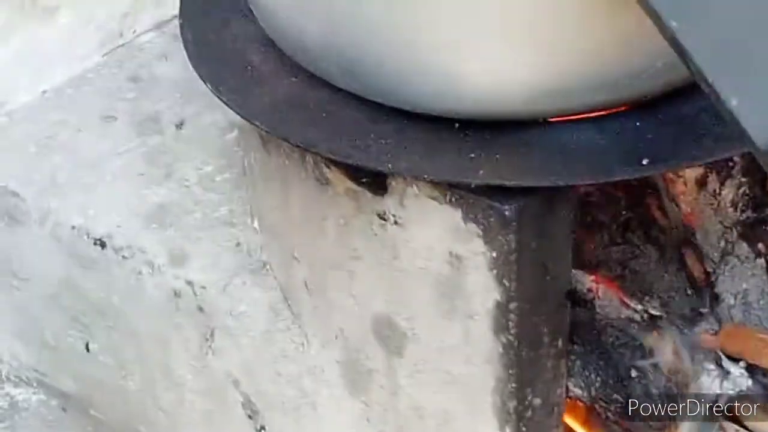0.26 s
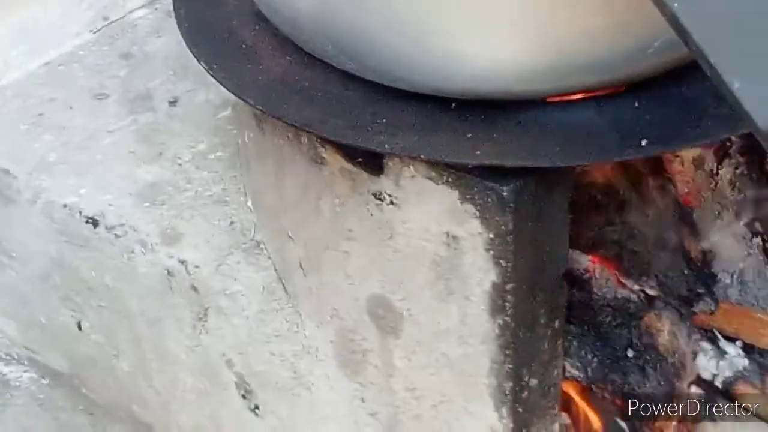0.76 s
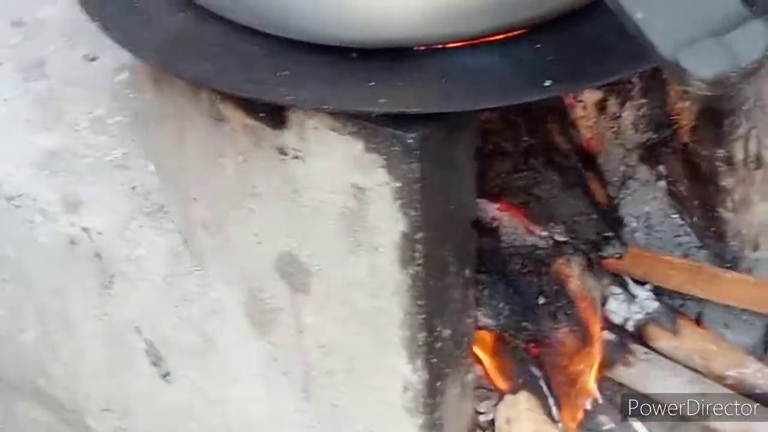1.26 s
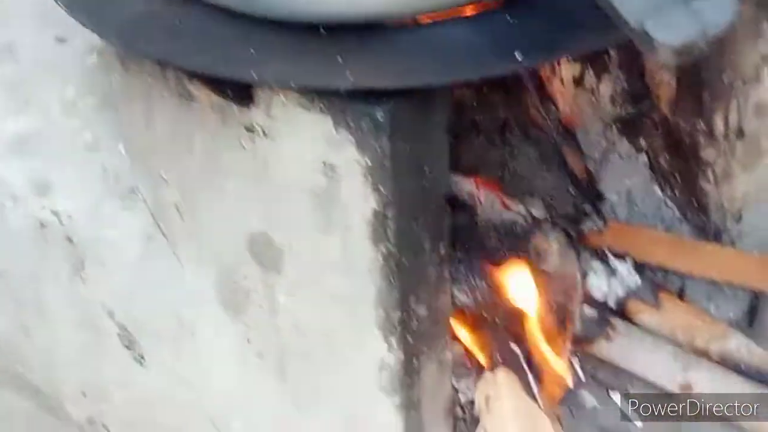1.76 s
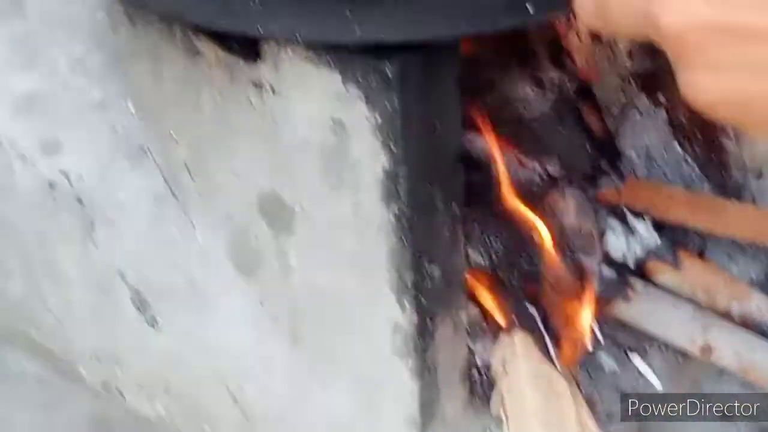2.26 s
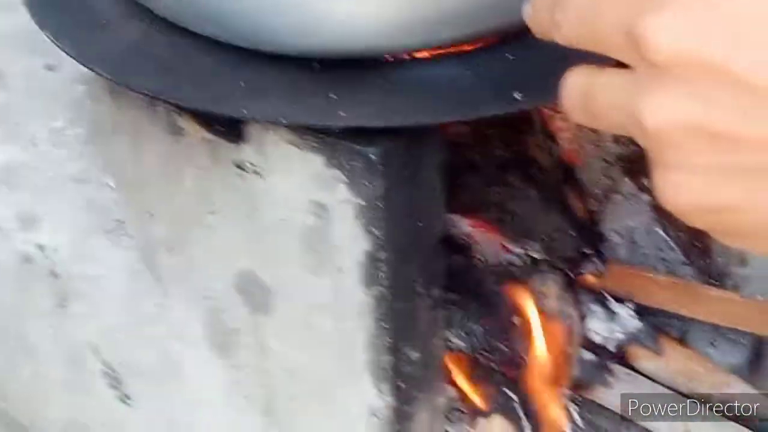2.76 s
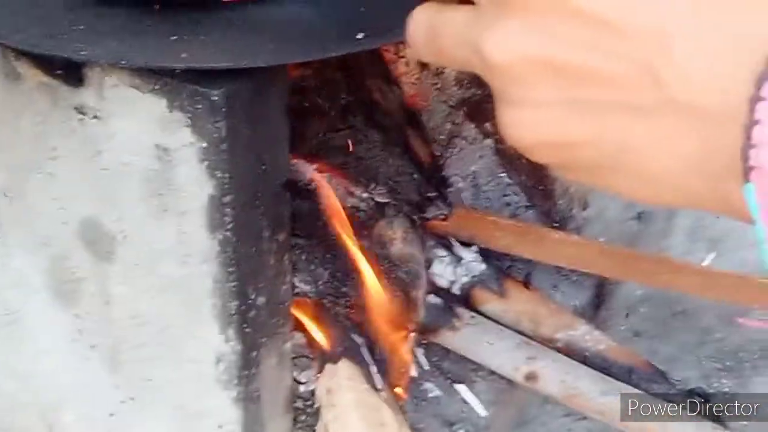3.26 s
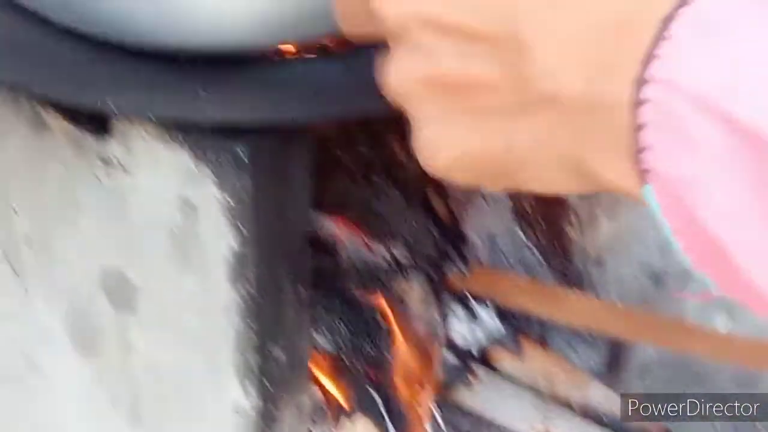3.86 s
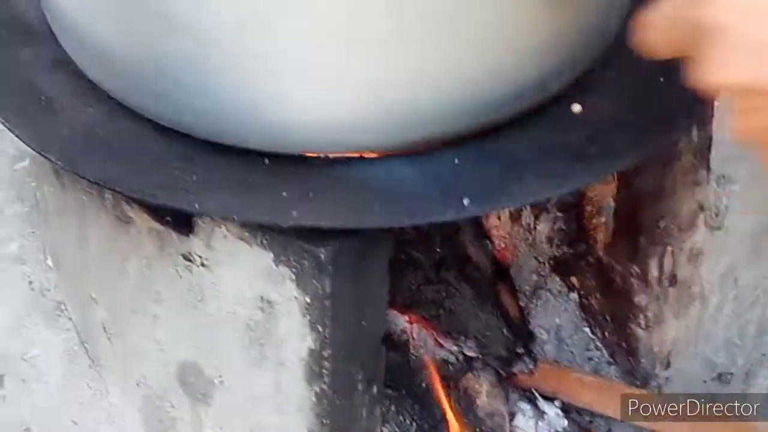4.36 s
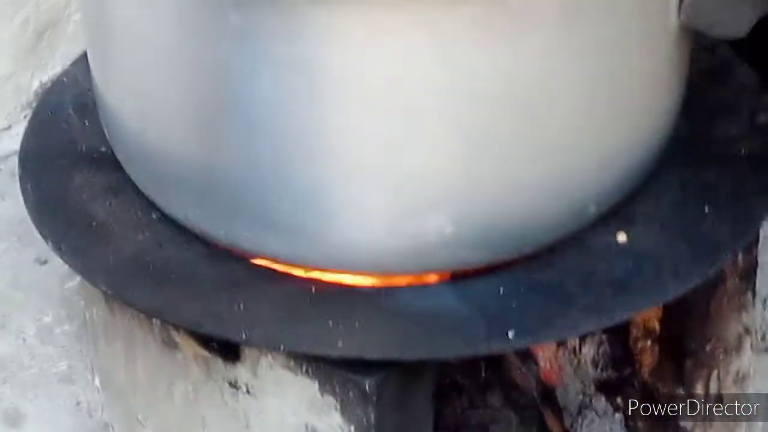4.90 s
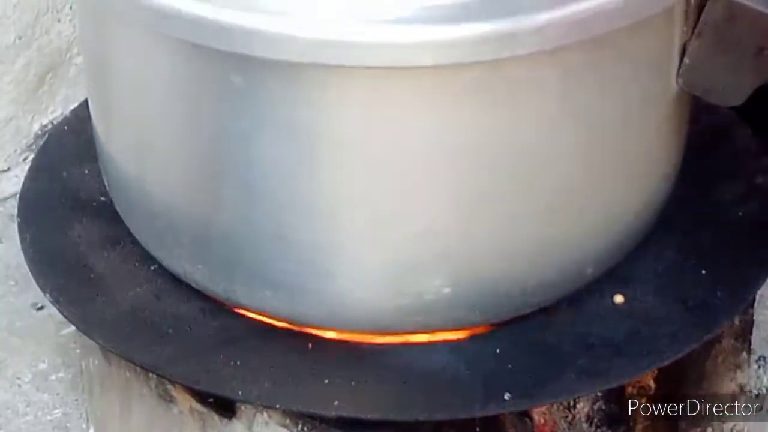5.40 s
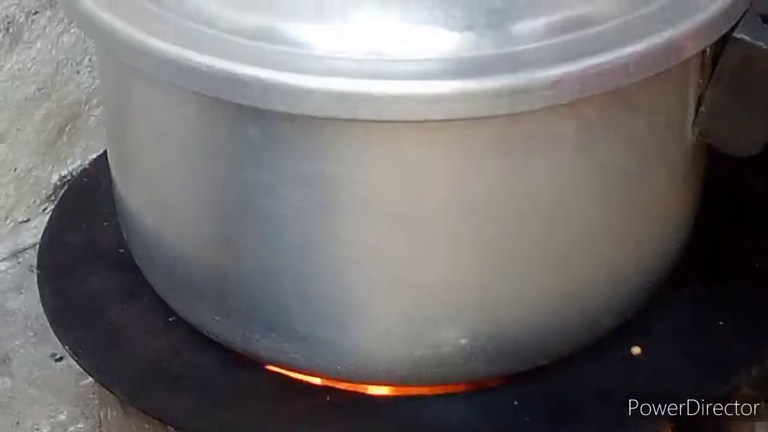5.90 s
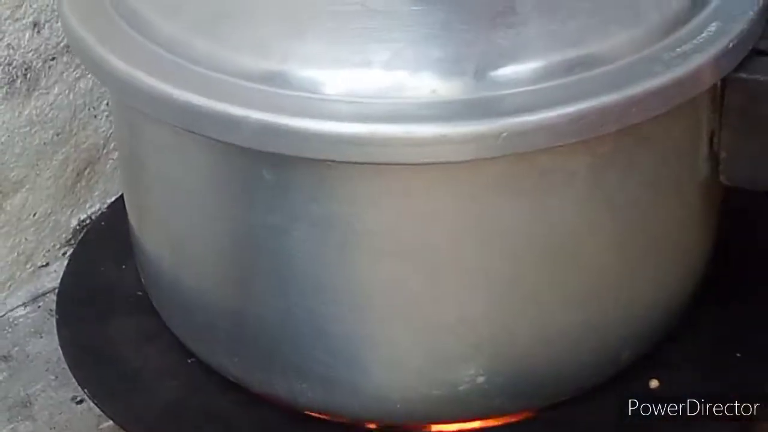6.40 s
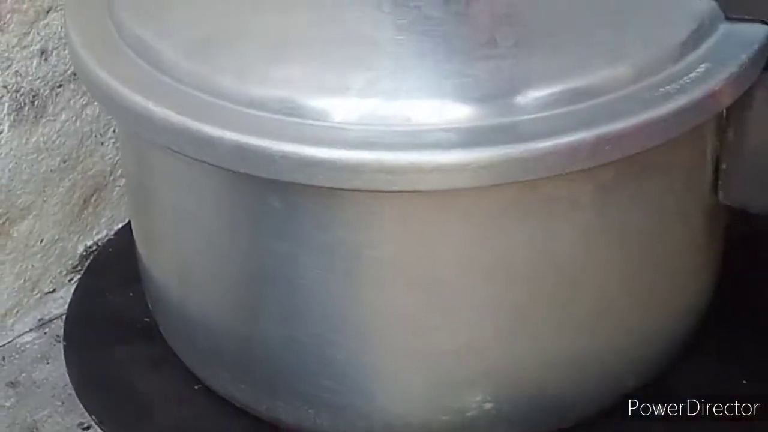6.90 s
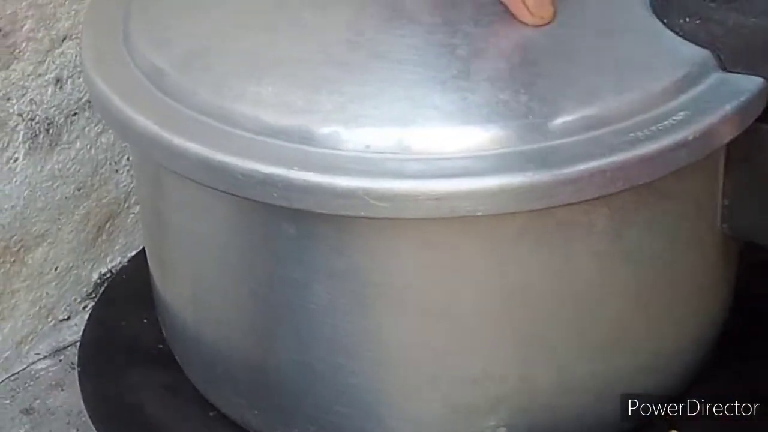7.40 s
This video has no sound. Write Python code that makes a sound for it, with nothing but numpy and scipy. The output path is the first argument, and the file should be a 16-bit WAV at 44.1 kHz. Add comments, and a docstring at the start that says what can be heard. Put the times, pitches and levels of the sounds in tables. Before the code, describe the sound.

A phone held near a metal pot in the open air picks up quiet touches, a sharp clear clink early on, then dull booming knocks and snappy ticks in the middle. Small scrapes and rattles of the lid follow, and the strongest burst of hollow metal clunks comes near the end, fading to tiny ticks. Low soft flutter, faint hiss and a distant wavering motor stay far underneath, without noticeable echo.

```python
"""Outdoors beside a small wood fire, an aluminium pot and its lid are handled close to a phone.
Knocks, ticks and scrapes are shaped noise filtered by the damped modes of the pot;
single modes also stand out as decaying or sustained sines. Low throbs, resonant noise, flutter
in bursts and thump under heavy knocks; a far motor hums as two sines on one wavering pitch;
the open air hisses faintly as coloured noise whose bands drift."""
import sys
import numpy as np
from scipy import signal
from scipy.fft import rfft, irfft, next_fast_len
from scipy.io import wavfile
from scipy.ndimage import uniform_filter1d

SR = 44100
rng = np.random.default_rng(int(sys.argv[2]) if len(sys.argv) > 2 else 0)


def bounce(signal):
    """Save signal as a 16-bit WAV file at the path given by the first command-line argument."""
    frames = np.transpose(np.atleast_2d(signal))
    limited = np.clip(frames, -1, 1)
    pcm = np.round(limited * 32767).astype(np.int16)
    wavfile.write(sys.argv[1], SR, pcm)


N = 337365

# frequency bands of a contact, in order thud, body, clink, edge, air: low_hz, high_hz
BANDS = [(90, 300), (300, 1200), (1200, 4000), (4000, 8000), (8000, 18000)]
# pot and lid modes, damped by the hand: mode_hz, level_db (relative), t60_s
POT_MODES = [(120, -6, .2), (165, 0.6, .24), (221, -3, .2), (295, -3, .15), (390, -2, .12), (533, -5, .12),
             (690, -8, .1), (790, -7, .11), (880, -12, .09), (1010, -6, .08), (1083, -11, .08),
             (1312, -10, .08), (1510, -14, .12), (1628, -4, .14), (1814, -12, .14), (2035, -12, .1),
             (2210, -16, .1), (2320, -8, .06), (2555, -16, .09), (2760, -18, .09), (3015, -10, .07),
             (3245, -10, .08), (3540, -14, .07), (3900, -14, .06), (4350, -16, .06), (4590, -14, .05),
             (4750, -18, .05), (5130, -14, .05), (5440, -14, .04), (5720, -15, .04), (6200, -20, .035)]
# knocks: start_s, clink_db, body_db and edge_db (both above the clink), brightest_hz,
# rattle_s (t60 before the stretch of each band)
KNOCKS = [(0.353, -65, -6, -1, 1860, 0.098), (.375, -59, -17, -6, 1800, 0.13),
          (0.441, -70, -12, -12, 1750, 0.063), (0.606, -71.5, -1, -13, 2230, 0.19),
          (0.624, -79, 18.5, -1, 338, 0.072), (1.2514, -47.5, -19, -6.5, 1463, 0.08),
          (1.3573, -24, -17, -3, 3260, 0.12), (1.4519, -49, -14, -11.5, 760, 0.029),
          (1.5809, -38, -6, -7, 690, 0.066), (1.599, -63.5, -19, -19.5, 1628, 0.26),
          (2.09, -78, 21.5, -15, 515, 0.16), (2.468, -60, -10, -4, 1450, 0.12),
          (2.6677, -63.5, 28, 6.5, 241, 0.18), (2.751, -31, 2.5, -12, 158, 0.23),
          (2.988, -70.5, 16, -8, 440, 0.12), (3.034, -58.5, 19, -10, 590, 0.11),
          (3.1189, -43, 6.5, -4.5, 165, 0.12), (3.1838, -33.5, 2.5, 0, 203, 0.13),
          (3.2466, -44, 5, -26.5, 445, 0.042), (3.3949, -68, 13, -20.5, 725, 0.14),
          (3.844, -72, 24, -12, 440, 0.079), (3.947, -65, 3, -12, 1353, 0.063),
          (3.9643, -54, 12.5, -5, 446, 0.07), (4.12, -52.5, 8, -1.5, 418, 0.49),
          (4.2436, -56.5, 11, 3.5, 361, 0.16), (4.2823, -49, 8.5, -7, 335, 0.29),
          (4.366, -58, 3, -11, 785, 0.04), (4.4592, -45, 9, -7, 730, 0.16), (4.591, -58, 5, 6, 790, 0.054),
          (4.9069, -44, -36.5, -12.5, 1634, 0.026), (5.0725, -42, -30, -8.5, 1142, 0.036),
          (5.185, -38, 13.5, -2.5, 334, 0.078), (5.448, -74.5, 22, -12.5, 201.6, 0.13),
          (5.4802, -73, 20, -14, 425.5, 0.044), (5.601, -49.5, 9.5, -16.5, 255, 0.067),
          (5.8417, -64, -10, -9.5, 1160, 0.25), (5.8798, -65.5, 9.5, 5.5, 550, 0.096),
          (6.0471, -52, -6, -14, 1300, 0.06), (6.065, -49, 12.5, -27, 382, 0.062),
          (6.1536, -34.5, 3, -14.5, 642, 0.071), (6.4432, -55.5, 19, -4.5, 629.8, 0.29),
          (6.46, -57, 17, -16, 600, .04), (6.483, -51, 7, -4.5, 304, 0.021),
          (6.521, -33, 5.5, -13, 227, 0.082), (6.5993, -26, 4.5, -4.5, 480, 0.086),
          (6.616, -39, 1, -6, 900, 0.027), (6.6455, -22.5, 4, -6.5, 573, 0.052),
          (6.6571, -31.5, -9, -2, 396, 0.045), (6.754, -61, 10, -20, 1000, .04),
          (6.772, -56, 11, -10, 1017, 0.022), (6.7863, -29.5, -5.5, -18, 215, 0.083),
          (6.843, -40, 6.5, -28, 200, 0.03), (6.9354, -55.5, 18.5, -0.5, 208, 0.1),
          (7.0755, -31, -37, -16, 3640, 0.025), (7.1038, -41.5, -8.5, -14.5, 1730, 0.086),
          (7.149, -46.5, 7.5, -24, 140, 0.044), (7.165, -49, 12.5, 1, 153.6, 0.038)]
# stretch of the rattle in each band, the bass lasting longest: factor (no unit)
RATTLE_STRETCH = [1.6, 0.85, 0.76, 0.64, 0.12]
BLOCK = 16384  # samples of one blow and of one filter response


def undb(db):
    """Decibel definition: amplitude is ten to the power of dB / 20."""
    return 10 ** (np.asarray(db) / 20)


def unit(x):
    """Root-mean-square normalisation: signals of equal power start from one level."""
    return x / np.sqrt(np.mean(x ** 2))


def clock():
    """Uniform sampling: the time of every sample in seconds."""
    return np.arange(N) / SR


def bin_hz(size):
    """Discrete Fourier transform: its bins lie SR / size apart."""
    return np.arange(size // 2 + 1) * SR / size


def curve(table):
    """Linear interpolation in time of the columns that follow the time column."""
    s, *columns = np.transpose(table)
    return [np.interp(clock(), s, column) for column in columns]


def shape(table, size):
    """Spectral colour: dB values joined by straight lines over log frequency give a filter gain."""
    hz, db = np.transpose(table)
    return undb(np.interp(np.log(bin_hz(size) + 1), np.log(hz), db))


def walk(rate_hz):
    """Band-limited random modulation: held random levels, averaged twice, with unit RMS."""
    hold = int(SR / rate_hz)
    held = np.repeat(rng.standard_normal(N // hold + 1), hold)
    return unit(uniform_filter1d(uniform_filter1d(held, hold), hold)[:N])


def quick_waver(samples):
    """Moving average of white noise, rescaled to unit spread, for fluctuation within one blow."""
    return uniform_filter1d(rng.standard_normal(BLOCK), size=samples) * np.sqrt(samples)


def motor():
    """Engine orders: the third order and a weak first share one wavering rotation."""
    # far motor: start_s, third_order_hz, level_db
    motor_track = [(0, 116.7, -78), (2.5, 118, -72), (3.6, 103.7, -66.5), (4.6, 105.2, -77.5),
                   (6, 94.5, -92.5), (7.65, 103.3, -70.5)]
    hz, db = curve(motor_track)
    phase = 2 * np.pi * np.cumsum(hz * (1 + .035 * walk(7.6))) / SR
    orders = np.sin(phase) + 0.19 * np.sin(phase / 3)
    return undb(db + walk(19)) * np.sqrt(2) * orders


def air():
    """Coloured broadband noise: overlapping octave bands drift together and flicker alone."""
    # open air: frequency_hz, density_db (per Hz, relative)
    air_colour = [(15, -45.5), (25, -6.5), (70, 0.5), (103, 1.5), (167, -10), (244, -5.5), (829, -23.5),
                  (4110, -33), (5850, -29.5), (8100, -44), (13600, -44), (15200, -42), (16000, -57)]
    level_db = -66.5
    size = next_fast_len(N)
    hiss = rfft(rng.standard_normal(size)) * shape(air_colour, size)
    octave = np.log2(bin_hz(size) + 1)
    common_db = .8 * walk(3)
    total = np.zeros(N)
    for k in range(4, 16):
        # triangular weights over octaves add up to one
        weight = np.clip(1 - abs(octave - k), 0, 1)
        total += irfft(hiss * weight, size)[:N] * undb(common_db + 1.4 * walk(9))
    return unit(total) * undb(level_db)


def throb_level():
    """Attack, hold and decay: each throb rises fast, holds and falls to a rest, linearly in dB."""
    # low throbs, fluttering bursts and the deep thumps under heavy knocks: start_s, hold_s, level_db
    throbs = [(.28, 0.017, -58), (0.625, 0.19, -56.5), (1.425, 0.31, -72), (1.734, 0.28, -54.5),
              (2.1, 0.039, -52.5), (2.728, 0.014, -44.5), (3.181, 0.048, -33.5), (3.868, 0.24, -50.5),
              (4.306, .1, -46), (4.457, 0.12, -51.5), (5.18, 0.026, -42.5), (5.4, .02, -59.5),
              (5.606, 0.03, -56), (6.041, 0.025, -61), (6.602, .15, -46.5), (6.812, 0.034, -42.5),
              (7.18, 0.015, -65.5), (7.354, 0.018, -65), (7.589, 0.059, -59)]
    rise_db_s, fall_db_s, rest_db = 799.5, 169.5, -74
    t = clock()
    start, hold, db = (column[:, None] for column in np.transpose(throbs))
    loss = np.maximum(rise_db_s * (start - t), fall_db_s * (t - start - hold))
    return undb(np.maximum((db - np.maximum(loss, 0)).max(axis=0), rest_db))


def low_throbs():
    """Broad resonance: band-passed noise becomes low, unsteady flutter and deep thumps."""
    centre_hz, width_hz = 78.7, 27
    band = [centre_hz - width_hz / 2, centre_hz + width_hz / 2]
    resonance = signal.butter(2, band, "band", fs=SR, output="sos")
    tone = signal.sosfilt(resonance, rng.standard_normal(N))
    # partial compression keeps the swing fairly even
    swing = np.sqrt(uniform_filter1d(tone ** 2, size=1500))
    return unit(tone / swing ** 0.58) * throb_level()


def metal(size):
    """Modal resonance: each mode is a complex pole whose bandwidth follows from its decay time."""
    # colour of bare metal contact: frequency_hz, density_db (per Hz, relative)
    contact_colour = [(40, -30), (90, -14), (140, -5), (390, -5), (800, -9), (1360, -16), (3250, -22),
                      (6300, -23), (7600, -33), (10000, -39), (13000, -48), (15200, -43), (16400, -52)]
    hz = bin_hz(size)
    mode_hz, db, t60 = (column[:, None] for column in np.transpose(POT_MODES))
    half_width_hz = np.log(1000) / (2 * np.pi * np.clip(t60, .02, .25))
    # neighbouring modes alternate in sign
    sign = (-1.) ** np.arange(len(POT_MODES))[:, None]
    modes = sign * undb(db) / (half_width_hz + 1j * (hz - mode_hz))
    gates = []
    for band in BANDS:
        sos = signal.butter(4, band, "band", fs=SR, output="sos")
        gates.append(signal.sosfreqz(sos, hz, fs=SR)[1])
    return hz, gates, shape(contact_colour, size), modes


def response_rms(response):
    """Root mean square of a frequency response over its bins."""
    return np.sqrt(np.mean(np.abs(response) ** 2))


def sounding(gate, bare, ring, ring_db):
    """Superposition in one band: bare contact at unit RMS plus modal ringing at a relative level."""
    contact = bare / response_rms(gate * bare)
    ringing = ring / response_rms(gate * ring)
    return gate * (contact + undb(ring_db) * ringing)


def ring_share_db(band, db):
    """Modal range: every band rings at the given level except the air band, which has no modes."""
    return db if band < len(BANDS) - 1 else -np.inf


def knock_bands(clink_db, body, edge, bright_hz):
    """Spectral balance of a knock: the lower its brightest pitch, the more thud over its body."""
    thud_hz, slope_db_per_octave, least_db, air_below_edge_db = 211, -10, -23.5, 22
    thud = body + max(slope_db_per_octave * np.log2(bright_hz / thud_hz), least_db)
    return clink_db + np.array([thud, body, 0, edge, edge - air_below_edge_db])


def pressure():
    """Friction envelopes: a touch window times a swell for each stroke; knocks leave a dying clatter."""
    # rubbing strokes: touch_start_s, swell_peak_s, touch_end_s, clink_db, body_db, edge_db, air_db
    # (last three above the clink). Start and end bound the touch, silent where the end comes first;
    # the swell is set by its peak, which may lie outside. Thud and body sound at body_db plus the trim.
    strokes = [(0.27, 0.38, 0.41, -72.5, -4, 9, 4), (0.43, 0.46, 0.66, -73, 0, -8, -4.5),
               (0.57, 0.603, 0.7, -81, 9, -20, -11), (1.32, 1.405, 1.68, -57, -24, -11, -31),
               (3.07, 3.024, 3.38, -64, 4, 1.5, -48), (3.12, 3.19, 3.288, -47.5, 15.5, 3, -43),
               (4, 4.123, 4.29, -59, 10, -1.5, -6.5), (4.2, 4.287, 4.41, -54.5, 11, 0, -3.5),
               (4.516, 4.479, 4.787, -50.5, 3, -3, -9), (4.75, 4.6, 4.68, -56, 1.5, 6, 8),
               (5.42, 5.3, 5.45, -78, 19, -3.5, -9), (5.7, 5.776, 5.9, -76, 14, -9.5, -3.5),
               (2, 2.094, 1.95, -87, 14.5, -15.5, -19.5), (5.95, 6.06, 6.2, -66, 0, 5.5, -12),
               (6, 6.2, 6.25, -80, 23.5, -1, -18), (6.55, 6.628, 6.74, -44.5, 10, -2, -39),
               (6.94, 6.792, 6.86, -51, 14.5, 6, -24), (7, 7.085, 7.24, -62.5, 9, 4, -17),
               (6.94, 6.929, 7.1, -64.5, 5.5, 3, -33), (6.6, 6.865, 6.87, -56, 11.5, 1.5, -30),
               (3.95, 4.03, 4.1, -70.5, 14, -8, -8), (4.34, 4.4, 4.49, -64.5, 12.5, -5, -8),
               (2.97, 3.02, 3.06, -62.5, -7, -3.5, -36), (6.84, 6.89, 6.95, -63, 7, -5, -28)]
    body_trim_db, swell_ends_db, touch_s = -3.5, -23, 0.004
    # clatter of the loose lid: level against the knock, length in rattle times
    clatter_db, clatter_stretch = -24, 3.16
    t, gains = clock(), np.zeros((len(BANDS), N))
    for touch_start, swell_peak, touch_end, clink, body, edge, top in strokes:
        touch = np.clip(1 + np.minimum(t - touch_start, touch_end - t) / touch_s, 0, 1)
        swell_times = [touch_start, swell_peak, touch_end]
        swell_db = np.interp(t, swell_times, [swell_ends_db, 0, swell_ends_db])
        low = body + body_trim_db
        band_db = clink + np.array([low, low, 0, edge, top])
        gains += touch * undb(swell_db) * undb(band_db)[:, None]
    for s, clink, body, edge, hz, rattle_s in KNOCKS:
        at = slice(int(s * SR), int(s * SR) + BLOCK)
        lasts = clatter_stretch * rattle_s * np.array(RATTLE_STRETCH)[:, None]
        band_db = knock_bands(clink, body, edge, hz)[:, None]
        gains[:, at] += undb(band_db + clatter_db - 60 * (t[at] - s) / lasts)
    return gains


def rub():
    """Friction excitation: dense uneven grains in slips drive the same modal filter as the knocks."""
    grain_samples, grit_db, ring_db = 60, 4.5, 6.
    place_count, place_spread_db = 7, 7.
    _, gates, bare, modes = metal(BLOCK)
    gains = pressure()
    sizes = np.minimum(rng.exponential(size=N // grain_samples + 1), 3)
    grains = rng.standard_normal(N) * undb(grit_db * sizes.repeat(grain_samples)[:N])
    # the contact wanders between places on the rim at constant total power
    places = undb([9 * walk(22) for _ in range(place_count)])
    places = places / np.sqrt(np.sum(places ** 2, axis=0))
    # each place has its own mix of modes
    rings = undb(place_spread_db * rng.standard_normal((place_count, len(POT_MODES)))) @ modes
    slips_db = 2.5 * walk(40)
    out = np.zeros(N)
    for k, gate in enumerate(gates):
        heard = np.zeros(N)
        for place, ring in zip(places, rings):
            response = sounding(gate, bare, ring, ring_share_db(k, ring_db))
            impulse = np.fft.fftshift(irfft(response, BLOCK))
            heard += signal.oaconvolve(grains * place, impulse, "same")
        out += unit(heard) * gains[k] * undb(slips_db + 1.2 * walk(25))
    return out


def single_modes():
    """Free and sustained vibration: struck modes decay exponentially, rubbed ones hold unevenly."""
    # light rubs, each sounding the pot mode nearest to pitch_hz: start_s, end_s, pitch_hz, level_db
    sung = [(0.307, 0.39, 4750, -75), (0.323, .405, 4300, -69.5), (0.333, .41, 1814, -67),
            (0.39, 0.414, 1628, -67), (0.444, 0.466, 1814, -75), (0.513, .53, 3015, -66),
            (.6, 0.643, 2300, -70.5), (0.596, 0.632, 2035, -71.5), (4.053, 4.3, 1510, -79),
            (4.33, 4.416, 1270, -67), (3.025, 3.08, 3050, -62), (5.545, 5.575, 1620, -68),
            (5.55, 5.597, 2320, -71.5), (5.3, 5.348, 1813, -72.5), (5.974, 6.037, 1510, -66.5),
            (5.99, 6.026, 6200, -70), (4.66, 4.722, 533, -62), (4.1, 4.2, 790, -58), (4.1, 4.21, 2210, -65),
            (4.106, 4.197, 2760, -66), (4.1, 4.197, 4800, -71), (4.24, 4.32, 2760, -68),
            (4.472, 4.57, 2190, -66.5), (4.477, 4.523, 4720, -62), (4.59, 4.757, 2210, -69),
            (4.656, 4.7, 1814, -60), (4.683, 4.707, 4350, -59)]
    # blows, each sounding the pot mode nearest to pitch_hz: start_s, pitch_hz, level_db, t60_s
    rung = [(1.254, 1628, -59, .12), (1.253, 790, -53, 0.087), (1.254, 2320, -59, 0.09),
            (1.358, 2320, -29, 0.09), (1.358, 3015, -34, 0.075), (1.358, 3245, -33, .12),
            (1.358, 1814, -40.5, 0.2), (1.358, 4590, -46, 0.14), (1.452, 790, -51.5, 0.093),
            (1.452, 2035, -56, 0.16), (1.583, 1628, -53, 0.21), (1.582, 2035, -65, 0.42),
            (1.582, 2555, -69, 0.25), (1.725, 1628, -66.5, 0.091), (1.849, 2035, -69, .08),
            (2.667, 390, -26, 0.066), (2.668, 1510, -60, .2), (2.753, 1628, -35.5, 0.21),
            (2.668, 165, -37.5, 0.21), (5.191, 120, -39.5, 0.24), (5.602, 790, -44, 0.094),
            (6.064, 1312, -45, 0.043), (6.155, 1800, -41.5, 0.078), (6.154, 533, -40, .05),
            (5.768, 533.2, -63, .15), (5.888, 533, -59, 0.09), (7.076, 3540, -42, 0.048),
            (5.25, 533, -61.5, 0.38), (5.36, 533, -63.5, .1), (3.966, 790, -54, 0.12),
            (4.367, 790, -56, .06), (2.754, 2035, -37.5, .14), (2.753, 3015, -39, 0.13),
            (2.754, 390, -38, .12), (2.85, 2035, -69, 0.23), (2.988, 1628, -69, 0.33),
            (2.988, 1312, -67, 0.42), (3.034, 533, -38, 0.069), (3.118, 1010, -32, 0.038),
            (3.185, 1010, -44, 0.075), (3.201, 790, -41, .1), (3.201, 2210, -43, 0.1),
            (3.247, 1010, -38, .05), (4.46, 790, -45.5, .08), (4.855, 880, -75, 0.43),
            (5.183, 2035, -43.5, 0.089), (5.184, 390, -28, 0.083), (5.2, 880, -56.5, 0.19),
            (5.477, 533, -51.5, 0.051), (6.521, 2210, -42.5, 0.094), (6.521, 5440, -52, 0.092),
            (6.6, 1010, -27, .06), (6.647, 1010, -17.5, 0.034), (6.658, 1628, -41, 0.085),
            (6.66, 390, -33, 0.19), (6.788, 1510, -50, 0.083), (6.844, 1010, -42, .06)]
    struck_waver_db, rubbed_waver_db, rub_edge_s, onset_s = 3.5, 6., .012, .001
    t, out = clock(), np.zeros(N)
    mode_hz = np.transpose(POT_MODES)[0]

    def tone(hz, at):
        """Simple harmonic motion of the nearest pot mode, in random phase at unit RMS."""
        nearest_hz = mode_hz[np.argmin(abs(mode_hz - hz))]
        return np.sqrt(2) * np.sin(2 * np.pi * (nearest_hz * t[at] + rng.random()))

    # shifting the waver by the pitch gives different pitches different wavers
    rubbed = rubbed_waver_db * walk(120)
    for start, end, hz, db in sung:
        at = slice(int(start * SR), int(end * SR))
        touch = np.clip(np.minimum(t[at] - start, end - t[at]) / rub_edge_s, 0, 1)
        out[at] += tone(hz, at) * touch * undb(db + np.roll(rubbed, int(hz))[at])
    struck = struck_waver_db * walk(110)
    for s, hz, db, t60 in rung:
        at = slice(int(s * SR), int((s + 1.5 * t60) * SR))
        since = t[at] - s
        level = undb(db + np.roll(struck, int(hz))[at] - 60 * since / t60)
        out[at] += tone(hz, at) * level * (1 - np.exp(-since / onset_s))
    return out


def blows():
    """Spectral envelopes of impacts: start, band levels, brightest pitch and rattle of each."""
    # small bright ticks: start_s, level_db (at the brightest pitch), brightest_hz,
    # rattle_s (t60 before the stretch of each band)
    ticks = [(0.4997, -63.5, 6540, 0.36), (.6483, -68.5, 5500, 0.02), (0.798, -66, 3730, 0.084),
             (1.135, -57, 6750, 0.075), (1.5116, -53.5, 8600, 0.14), (1.69, -62.5, 9280, 0.084),
             (1.848, -63, 5500, 0.035), (1.945, -66.5, 6630, 0.042), (1.962, -71, 6000, 0.027),
             (2.313, -65.5, 4860, 0.07), (2.348, -66, 6500, 0.043), (2.372, -71.5, 8900, 0.035),
             (2.437, -72, 7000, 0.027), (2.6347, -42, 6900, 0.025), (3.0566, -45.5, 4640, 0.08),
             (3.3258, -28, 7700, 0.025), (3.3274, -37, 14400, .02), (4.767, -65, 4148, 0.067),
             (4.9335, -61, 2500, 0.021), (5.106, -63, 10490, 0.024), (5.354, -68.5, 11160, 0.014),
             (5.484, -62.5, 10900, 0.026), (5.5065, -59.5, 9700, 0.055), (5.579, -66, 6050, 0.044),
             (5.7158, -60.5, 9300, 0.044), (5.8642, -59, 5670, 0.048), (5.9246, -67.5, 5780, 0.027),
             (6.22, -61, 9120, 0.047), (6.346, -51, 8200, 0.074), (6.3852, -63, 6100, 0.06),
             (6.575, -59, 5500, 0.027), (7.0803, -31, 8150, 0.089), (7.202, -39, 6301, 0.025),
             (7.3538, -55.5, 4900, 0.055), (7.4858, -51, 5620, 0.033), (7.558, -53, 8587, 0.063),
             (7.5662, -54, 8460, 0.035)]
    tick_db_per_octave = -14
    centres_hz = np.sqrt(np.prod(BANDS, axis=1))
    found = []
    for s, clink, body, edge, hz, rattle_s in KNOCKS:
        found.append((s, knock_bands(clink, body, edge, hz), hz, rattle_s))
    for s, db, hz, rattle_s in ticks:
        octaves_away = abs(np.log2(centres_hz / hz))
        found.append((s, db + tick_db_per_octave * octaves_away, hz, rattle_s))
    return found


def knocks():
    """Impact excitation: a sharp strike and a dying rattle of bounces drive the modal filter."""
    ring_db, spot_spread_db = -4, 4.
    bright_db, bright_width = 12, .4  # lift at the brightest pitch; width in natural log of pitch
    strike_db, strike_share = 5.5, 0.2  # strike above the rattle; its length in rattle times
    grip = 4.  # t60 of the hand's choking, in rattle times
    body_hz, body_tilt = 590, 0.98  # corner of the body; slope as share of the clink step per octave
    out, t = np.zeros(N + BLOCK), np.arange(BLOCK) / SR
    hz, gates, bare, modes = metal(BLOCK)
    for s, levels, bright_hz, rattle_s in blows():
        noise = rng.standard_normal(BLOCK)
        bounces = undb(3.6 * quick_waver(88))
        # every blow lands on another spot and wakes the modes differently
        ring = undb(spot_spread_db * rng.standard_normal(len(POT_MODES))) @ modes
        log_distance = np.log((hz + 1) / bright_hz)
        lift = undb(bright_db * np.exp(-(log_distance / bright_width) ** 2))
        # the shortest, hardest blows keep their treble
        colour = bare ** np.clip(rattle_s / 0.036, .2, 1)
        lid_waver = undb(2.42 * quick_waver(400))  # a loose lid makes the ring waver
        at = int(s * SR)
        for k, (gate, db) in enumerate(zip(gates, levels)):
            lasts = np.clip(rattle_s * RATTLE_STRETCH[k], .004, .6)
            rattle = undb(-60 * t / lasts)
            strike = undb(strike_db - 60 * t / (strike_share * lasts))
            onset = 1 - np.exp(-t / (0.04 * lasts))
            push = noise * bounces * (rattle + strike) * onset
            if k == 1:
                # a body louder than the clink loses its top, a quieter one its bottom
                tilt_db = body_tilt * (levels[2] - db) * np.log2((hz + 1) / body_hz)
                gate = gate * undb(np.minimum(tilt_db, 0))
            response = lift * sounding(gate, colour, ring, ring_share_db(k, ring_db))
            heard = irfft(rfft(push) * response, BLOCK)
            # the grip that stops the rattle also chokes the ring
            heard = heard * lid_waver * undb(-60 * t / (grip * lasts))
            # the level applies to the peak of the short-time RMS
            peak = np.sqrt(uniform_filter1d(heard ** 2, size=300).max())
            out[at:at + BLOCK] += heard * undb(db) / peak
    return out[:N]


def scene():
    """Linear superposition of all sources in one channel."""
    return (motor() + air() + low_throbs() + rub() + single_modes() + knocks())[None]


def record(dry):
    """Band limitation: the phone drops the deepest bass (below 52 Hz) and cuts the top (16 kHz)."""
    dry = signal.sosfilt(signal.butter(3, 52., "high", fs=SR, output="sos"), dry)
    return signal.sosfilt(signal.ellip(8, .2, 70, 16000, fs=SR, output="sos"), dry)


dry = scene()
out = record(dry)
bounce(out)
```